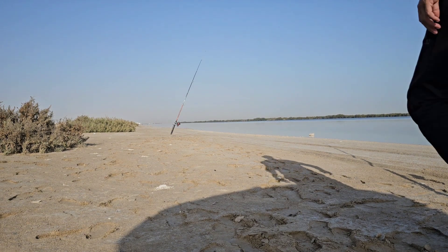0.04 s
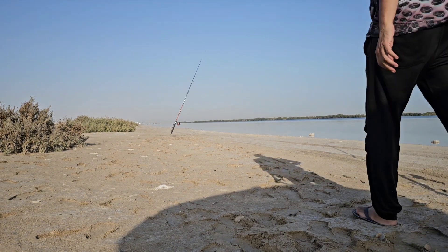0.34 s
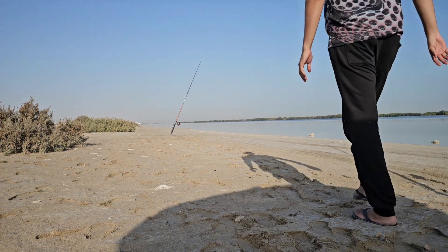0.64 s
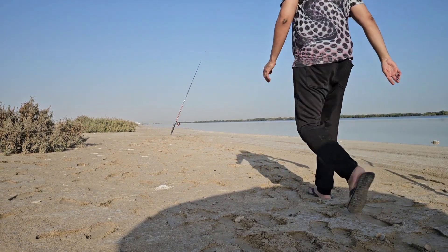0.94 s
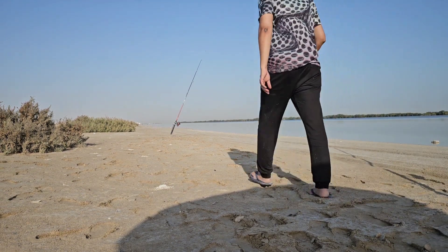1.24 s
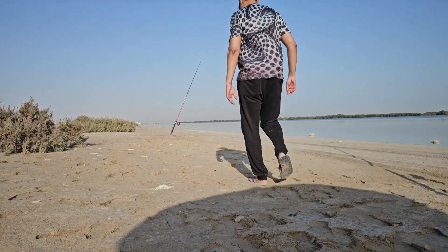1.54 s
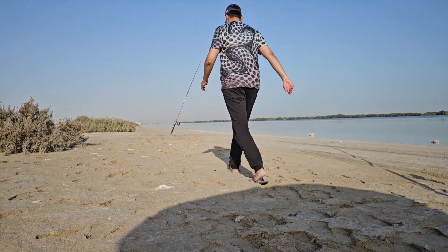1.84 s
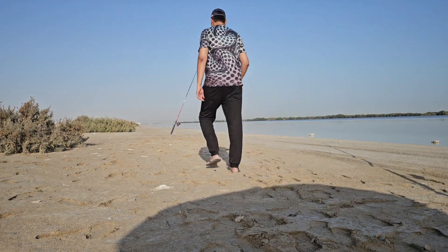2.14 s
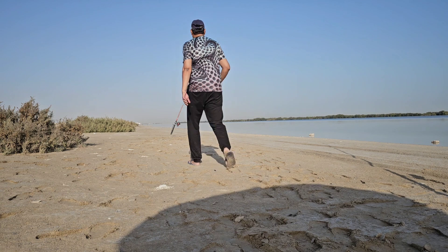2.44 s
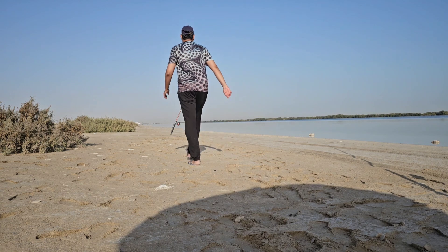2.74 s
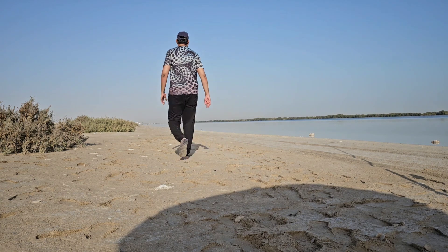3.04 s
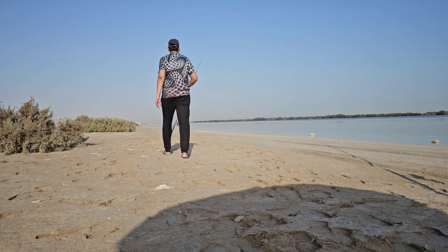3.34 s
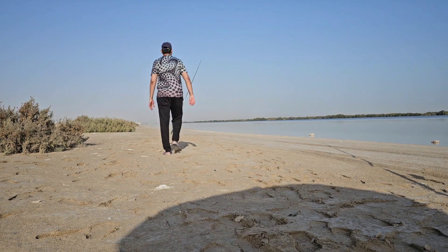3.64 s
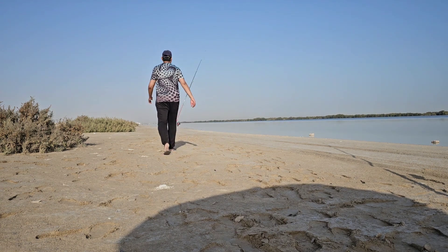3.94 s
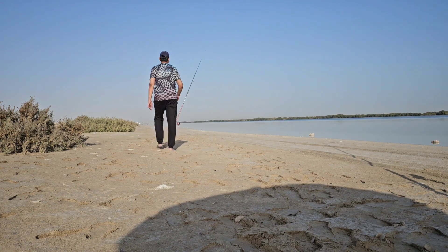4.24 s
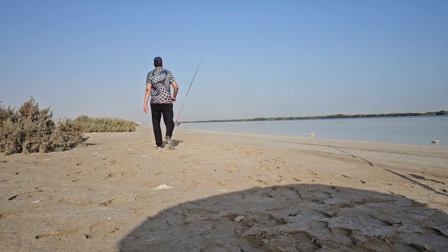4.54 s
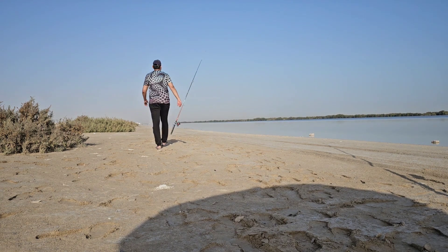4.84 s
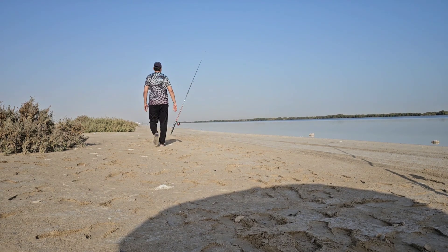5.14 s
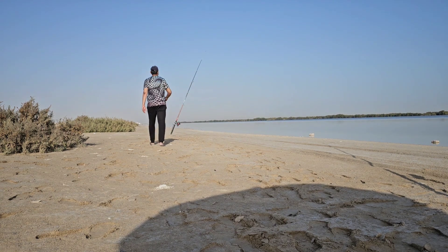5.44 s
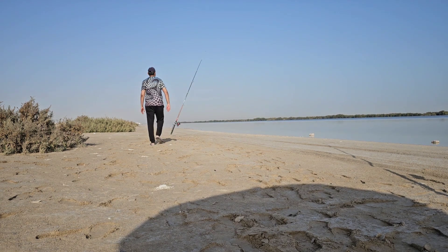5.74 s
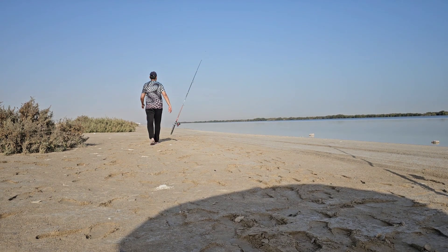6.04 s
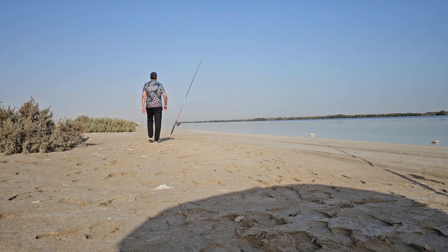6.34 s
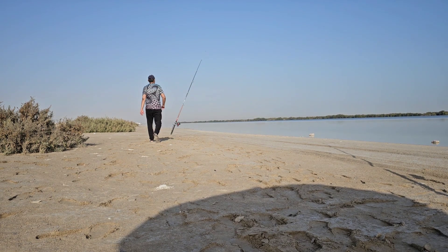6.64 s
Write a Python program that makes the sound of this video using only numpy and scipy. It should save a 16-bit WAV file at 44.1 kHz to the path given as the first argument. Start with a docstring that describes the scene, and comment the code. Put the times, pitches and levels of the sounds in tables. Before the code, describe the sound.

Flip-flops slap and crunch over dry crusted sand, fading as someone walks away, with steady wind rumbling on the microphone.

```python
"""Flip-flops on a sandy shore

Someone passes on the right of a stereo microphone and walks off, from under 2 m to about 8 m away. At each step
the heel lands, the sole grinds the dry crust, and the other sandal snaps up at its heel. Wind rumbles steadily
on the microphone, over a faint low hum and a thin far hiss."""
import sys
import numpy as np
from scipy import signal
from scipy.fft import rfft, irfft, next_fast_len
from scipy.io import wavfile
from scipy.ndimage import uniform_filter1d, map_coordinates

SR = 44100
rng = np.random.default_rng(int(sys.argv[2]) if len(sys.argv) > 2 else 0)


def unload_wav(signal):
    """Save mono or channel-first audio to the path in sys.argv[1] as 16-bit WAV at rate SR, clipped to [-1, 1]."""
    wavfile.write(
        sys.argv[1],
        SR,
        np.round(np.clip(np.atleast_2d(signal).T, -1, 1) * 32767).astype(np.int16),
    )


N = 298998
TIME = np.arange(N) / SR

# spectrum of the far hiss: freq_hz, level_db
FAR_SPECTRUM = [(300, 8.5), (700, 7.5), (1050, 2.5), (1450, -1.5), (2100, -5), (2700, -3.5), (4400, -2),
                (5400, -8.5), (6300, -7), (8000, -22), (11500, -14), (15500, -9.5)]
# narrow, faintly flickering bands that colour the background hiss: centre_hz, q, level_db
FAR_BANDS = [(1450, 6.3, -10.5), (2010, 8.4, -15), (3580, 16, -16), (4190, 18, -16.5), (4600, 8.6, -14)]
# tones of the low hum: pitch_hz, level_db
HUM_TONES = [(50, -48), (75.2, -51), (150.3, -59), (199.8, -64), (230.5, -69.5), (245, -66.5)]
# spectrum of wind on the microphone: freq_hz, level_db
WIND_SPECTRUM = [(10, -32.5), (17, -17.5), (27, -1.5), (45, 2), (72, 3), (100, -3.5), (130, -7), (175, -14),
                 (240, -17), (300, -26), (420, -36.5), (550, -41), (750, -64), (1400, -84)]
# strength of the wind: time_s, level_db
WIND_LEVEL = [(.03, -38), (.2, -36.5), (.245, -50), (.31, -39.5), (.6, -42), (.76, -38.5), (1.1, -39.5),
              (1.9, -41), (2.0, -40.5), (2.2, -40.5), (2.7, -39), (4.2, -41), (4.47, -40), (4.6, -38),
              (5.25, -41), (6.15, -39), (6.6, -40), (6.75, -40.5)]
# the walker's bearing at the microphone: time_s, left_lag_ms, treble_left_minus_right_db
BEARING = [(0.45, 0.27, -3.5), (1.0, 0.13, 2.5), (1.499, 0.084, 1), (1.997, -0.00084, 3),
           (3.001, -0.067, 3.5), (4.101, -0.087, 4), (6.701, -0.12, 4.5)]
# hard surfaces next to the microphone: delay_ms, gain
NEAR_ECHOES = [(2.4, 0.049), (4.7, 0.13), (7.3, 0.044)]
# peaks and dips of the microphone housing: centre_hz, q, gain_db
HOUSING = [(3540, 18, -4), (3600, 26, 2.5), (4300, 18, 1), (5170, 29, -1), (5370, 24, 1), (6250, 22, 1),
           (6880, 26, -3.5), (7250, 18, 2), (9200, 44, -1), (9200, 47, -0.5), (11370, 40, 3),
           (12200, 12, -1.5)]
# rubber creaking under the foot: peak_s, width_s, pitch_hz, level_db
CREAKS = [(1.118, 0.0097, 3600, -69.5), (1.254, 0.033, 1800, -84.5), (2.45, 0.006, 1250, -71),
          (2.956, .010, 1380, -71.5)]
# spectra of loose sand, crumbling crust and sand cracking on a sole: freq_hz, level_db
SAND_SPECTRUM = [(1500, -11.5), (3000, 2.5), (4500, 1.5), (6000, -1.5), (7800, -4.5), (9500, -7.5),
                 (11500, -3), (13000, -8), (15500, -3.5)]
CRUST_SPECTRUM = [(250, -16.5), (600, 9.5), (1300, 11), (2200, 10), (3300, 0), (5000, -14), (9000, -14)]
CRACK_SPECTRUM = [(500, -23.5), (1500, -15), (3000, -1), (4800, -1.5), (6300, -6), (7600, -8.5), (9000, -9),
                  (11000, -15), (15500, -21)]
# bits of crust breaking, and at 4.093 s sand flung off the sandal landing back, before distance loss: # peak_s,
# rise_s, fall_s, centre_hz, level_db
CRUST_SNAPS = [(.3105, .0004, 0.0018, 5500, -61), (.408, 0.0093, 0.0087, 2930, -47.5),
               (0.465, .004, 0.0036, 8040, -52), (.848, 0.0024, 0.0067, 7060, -60),
               (0.929, .0004, 0.0009, 7600, -37), (1.3323, 0.0005, 0.0014, 3220, -36.5),
               (1.433, 0.0037, 0.0051, 2800, -49), (1.476, 0.0033, 0.0035, 2700, -56),
               (1.771, 0.0011, 0.0018, 9500, -55), (1.782, .001, 0.0021, 9000, -52.5),
               (1.789, .001, 0.0025, 8000, -51), (2.354, .0004, 0.00083, 4600, -45),
               (4.093, 0.0054, 0.0064, 9000, -46.5)]
# the footfall ahead of each slap, before distance loss: heel_lead_s, heel_hz, heel_db, heel_fall_s,
# grind_lead_s, grind_hz, grind_db, grind_rise_s, crust_over_sand_db, toe_db
FOOTFALLS = [ (0.1653, 8000, -49, 0.02, 0.08, 8700, -42, 0.01, -7.5, -54.5),
             (0.155, 2400, -49.5, 0.011, 0.086, 8700, -42, 0.012, -10, -55),
             (0.1636, 4500, -45, 0.0098, 0.09, 9100, -50, 0.016, -6.5, -55),
             (0.187, 7000, -44, 0.014, 0.084, 10300, -36.5, 0.0071, -14.5, -51.5),
             (0.1785, 4800, -54, 0.028, 0.078, 7700, -42, 0.009, -10, -52.5),
             (0.171, 6100, -61.5, 0.015, .081, 13000, -37.5, 0.0073, -15.5, -48.5),
             (0.189, 5800, -48.5, 0.018, 0.079, 12000, -45.5, 0.012, -9, -51.5),
             (.219, 4000, -51, .041, 0.08, 8500, -47, 0.012, -13, -53),
             (.2, 5800, -69, .016, .081, 8600, -58, .012, -8, -53),
             (.2, 6100, -79, .018, 0.081, 7000, -43, .010, -15, -46.5),
             (.185, 7200, -61, 0.0173, .081, 8600, -66.5, .012, -8, -51.5),
             (0.21, 6100, -74, .022, 0.072, 8300, -40, 0.0045, -17, -46),
             (.198, 6100, -52, .010, .081, 8600, -65, .011, -14.5, -51)]
# sandal meeting heel, before distance loss: start_s, second_touch_ms, second_share, contact_ms, clap_q,
# pocket_hz, pocket_db, body_db, low_clap_hz, low_clap_db, high_clap_hz, high_clap_db,
# sole_hz, sole_db, sand_db
SLAPS = [(0.4882, 2.34, 0.26, 0.02, 3.4, 340, 12.5, -1, 1830, 6.5, 2560, 3.5, 7200, -0.5, -6.5),
         (1.014, 0.88, 0.55, 0.051, 7.2, 600, 9.5, -8, 1950, 11.5, 2620, 9, 4200, 15.5, -2),
         (1.5008, 1.71, 0.23, 0.064, 2.65, 300, 16, 0.5, 1460, 3.5, 2420, 3, 4600, 7, -5.5),
         (2.0104, 0.93, 0.32, 0.053, 4.3, 290, 10.5, -9, 1560, 4, 2570, 2.5, 6370, 3, -3),
         (2.5222, 0.67, 0.74, 0.055, 3.35, 330, 7.5, 11, 2300, 5.5, 3600, -3, 5250, 3, -6.5),
         (3.0383, 0.78, 0.17, 0.023, 2.8, 350, 3, -7, 1430, 0, 3720, -6.5, 5330, -10, -2),
         (3.56, 0.56, 0.2, 0.028, 6.3, 280, 8.5, -1.5, 1290, 1, 1850, -3.5, 5640, -8, -4.5),
         (4.0724, 1.524, 0.5, 0.14, 4.9, 340, 11, -4, 1060, 13, 1740, 16, 5810, 20, 0.5),
         (4.6033, 0.8, 0.21, 0.14, 5.5, 310, 12.5, 8.5, 1340, 2, 1950, 20, 3020, 18, -3.5),
         (5.1495, 0.67, 0.2, 0.13, 1.45, 320, 4, -2, 900, 1, 2000, 6, 5130, 22, -2.5),
         (5.6698, 0.69, 0.75, 0.14, 2.4, 470, -7.5, 7.5, 1320, 0, 3140, 12, 6900, 7.5, -3.5),
         (6.1925, 0.58, 0.3, 0.025, 1.6, 420, 5, -12.5, 940, -3, 1740, -4.5, 3600, -6, 2.5),
         (6.721, 1.3, 0.35, 0.13, 4.2, 490, 3.5, -12, 1040, 5.5, 1900, 6, 4690, 5, 1.5)]


def undb(db):
    """Decibels to gain."""
    return 10 ** (np.asarray(db) / 20)


def unit(x):
    """Scale to rms 1."""
    return x / np.sqrt(np.mean(x ** 2))


def unit_energy(x):
    """Scale each row to energy 1."""
    return x / np.linalg.norm(x, axis=1, keepdims=True)


def butter(order, hz, kind):
    """Sections of a low-pass or high-pass filter."""
    return signal.butter(order, hz, kind, fs=SR, output="sos")


def colour(x, spectrum):
    """Minimum-phase filter through (freq_hz, level_db) points."""
    hz, db = np.transpose(spectrum)
    size = next_fast_len(x.shape[-1] + 4096, True)
    freqs = np.maximum(np.fft.rfftfreq(size, 1 / SR), 1)
    gain = undb(np.interp(np.log(freqs), np.log(hz), db))
    cepstrum = irfft(np.log(gain), size)
    cepstrum[1:size // 2] *= 2
    cepstrum[size // 2 + 1:] = 0
    return irfft(rfft(x, size) * np.exp(rfft(cepstrum)), size)[..., :x.shape[-1]]


def ring(x, hz, q):
    """A damped resonance, gain 1 at its centre, which is capped at SR / 4."""
    return signal.lfilter(*signal.iirpeak(min(hz, SR / 4), q, SR), x)


def wander(per_s):
    """Smooth random drift with a spread near 1."""
    return map_coordinates(rng.standard_normal(1024), [TIME * per_s], order=3, mode="wrap")


def grains(per_s, spread_db):
    """Tiny clicks at random times and of random size."""
    size = undb(spread_db * np.minimum(rng.exponential(size=N), 5))
    return unit((rng.random(N) < per_s / SR) * size * rng.standard_normal(N))


def stereo(mid, side, split_hz):
    """A left and right pair, alike in the bass and drifting apart above split_hz."""
    apart = signal.sosfilt(butter(2, split_hz, "high"), side)
    return np.array([mid + apart, mid - apart])


def far_shore(base_db=-81.5, early_db=4.0):
    """Hiss all around, a little louder at first; the stronger bands shimmer."""
    hiss = unit(colour(rng.standard_normal((2, N)), FAR_SPECTRUM))
    for hz, q, db in FAR_BANDS:
        shimmer_db = 2.2 * wander(16)
        hiss += unit(ring(rng.standard_normal((2, N)), hz, q)) * undb(db + shimmer_db)
    swell_db = 0.6 * wander(2.0)
    return hiss * undb(base_db + swell_db + early_db * np.exp(-TIME / 0.8))


def low_hum():
    """Faint low tones, each wavering in level and pitch."""
    hum = np.zeros(N)
    for hz, db in HUM_TONES:
        amplitude = np.sqrt(2) * undb(db + 2 * wander(1.8))
        pitch_hz = hz + 0.39 * wander(2.972)
        hum += amplitude * np.sin(2 * np.pi * np.cumsum(pitch_hz) / SR)
    return hum


def wind_and_hum(gust_db=0.97, side_db=-14, lean_left_db=1.25):
    """Wind rumbles on the microphone in mild gusts over the hum, nearly alike in both channels."""
    mid, side = (unit(colour(rng.standard_normal(N), WIND_SPECTRUM)) for _ in range(2))
    mid /= np.sqrt(uniform_filter1d(mid ** 2, SR // 4))  # leaves slow swells to the gusts
    gusts = undb(np.interp(TIME, *np.transpose(WIND_LEVEL)) + gust_db * wander(7))
    sign = np.array([[1], [-1]])
    rumble = gusts * (mid + undb(side_db) * sign * side)
    return (rumble + low_hum()) * undb(sign * lean_left_db / 2)


def near_echoes(x, above_hz=1500):
    """Small surfaces next to the microphone reflect the treble and ripple its colour."""
    treble = signal.sosfilt(butter(1, above_hz, "high"), x)
    return x + sum(gain * np.pad(treble, ((0, 0), (int(ms * SR / 1000), 0)))[:, :N]
                   for ms, gain in NEAR_ECHOES)


def ground_scatter(x, ground_t60_s=0.068, bush_t60_s=0.36, bush_db=-12, dull_hz=6000):
    """Rough ground throws back a short gritty tail, bushes a longer faint one."""
    t = TIME[:SR // 2]
    patches = rng.standard_normal((2, len(t))) * (rng.random((2, len(t))) < 2500 / SR)
    ground = patches * 1000 ** (-t / ground_t60_s) * (1 - np.exp(-t / 0.0044))
    bushes = rng.standard_normal((2, len(t))) * 1000 ** (-t / bush_t60_s) * (1 - np.exp(-t / 0.018))
    tail = unit_energy(ground) + undb(bush_db) * unit_energy(bushes)
    tail = signal.sosfilt(butter(1, dull_hz, "low"), tail)
    share = undb(np.linspace(-29, -8, N))  # grows as the walker moves off
    return signal.fftconvolve((x * share)[None], tail, axes=1)[:, :N]


def distance_m(s, start_m=1.61, pace_m_per_s=0.97):
    """From the microphone to the walker, who leaves at a steady pace."""
    return start_m + pace_m_per_s * s


def sand_gain(s, ground_db_per_m=2):
    """Sand noise spreads with distance and is soaked up by the ground."""
    return undb(-ground_db_per_m * distance_m(s)) / distance_m(s)


def place_walker(pair, shade_hz=1500):
    """The walker's bearing delays one channel against the other and tips the treble to one side."""
    s, lag_ms, pan_db = np.transpose(BEARING)
    lag = np.interp(TIME, s, lag_ms) * SR / 1000
    pan = np.interp(TIME, s, pan_db)
    heard = np.array([map_coordinates(x, [np.arange(N) - side * lag / 2], order=3)
                      for x, side in zip(pair, (1, -1))])
    treble = signal.sosfiltfilt(butter(1, shade_hz, "high"), heard)
    return heard + treble * (undb(np.array([pan, -pan]) / 2) - 1)


def rubber_creaks(q=5):
    """Rubber sticks and slips on the foot, ringing one rough resonance for a moment."""
    slips = grains(per_s=700, spread_db=1.5)
    out = np.zeros(N)
    for peak_s, width_s, hz, db in CREAKS:
        swell = np.exp(-.5 * ((TIME - peak_s) / width_s) ** 2)
        out += undb(db) * swell * unit(ring(ring(slips, hz, q), hz, q))
    return out


def sand_scuffs(slip_db=1.7):
    """Weight comes on and off the sole: loose grains hiss and the crust crumbles in small slips."""
    loose = stereo(grains(per_s=5000, spread_db=0.5), grains(per_s=11000, spread_db=0), split_hz=6000)
    sand = colour(loose, SAND_SPECTRUM)
    crust = unit(colour(grains(per_s=4900, spread_db=-2.2), CRUST_SPECTRUM))

    def rub(peak_s, rise_s, fall_s, hz, db, crunch, q=1.0):
        """One swell of grainy hiss with a share of crunching crust."""
        near = abs(TIME - peak_s) < 8 * max(rise_s, fall_s)
        t = TIME[near] - peak_s
        load = np.exp(-.5 * abs(t / np.where(t < 0, rise_s, fall_s)) ** 1.18)
        hiss = unit(ring(sand[:, near], hz, q))
        sound = np.zeros((2, N))
        sound[:, near] = undb(db) * load * (hiss + crunch * crust[near])
        return sound

    out = np.zeros((2, N))
    for (slap_s, *_), footfall in zip(SLAPS, FOOTFALLS):
        (heel_lead_s, heel_hz, heel_db, heel_fall_s,
         grind_lead_s, grind_hz, grind_db, grind_s, crust_db, toe_db) = footfall
        # trouser legs brush in mid-stride, the heel lands, the sole grinds, the rear toe sprays sand
        out += rub(slap_s - 0.35, rise_s=0.16, fall_s=0.16, hz=8440, db=-73, crunch=0)
        out += rub(slap_s - heel_lead_s, 0.005, heel_fall_s, heel_hz, heel_db, undb(crust_db + 3))
        out += rub(slap_s - grind_lead_s, grind_s, 0.7 * grind_s, grind_hz, grind_db, undb(crust_db))
        out += rub(slap_s - 0.0052, rise_s=0.015, fall_s=0.017, hz=6900, db=toe_db, crunch=undb(1))
    for snap in CRUST_SNAPS:
        out += rub(*snap, crunch=0.064, q=1.6)
    return out * sand_gain(TIME) * undb(slip_db * wander(240))


def sandal_slaps(pocket_q=2.09, body_hz=566, body_q=4, sole_q=6.0, grit_s=0.0032, rattle=0.2):
    """The sole claps the heel in two quick, hollow touches; trapped air pops and sand on it cracks."""
    out = np.zeros((2, N + SR))
    t = TIME[:2048]
    tick = 0.26 * (np.arange(len(t)) == 2)
    for (start_s, second_ms, second_share, contact_ms, clap_q, pocket_hz, pocket_db, body_db,
         low_hz, low_db, high_hz, high_db, sole_hz, sole_db, sand_db) in SLAPS:
        ages = (np.maximum(t * 1000 - ms, 0) / contact_ms for ms in (0, second_ms))
        first, second = (age * np.exp(-age) for age in ages)
        push = (first + second_share * second) / first.sum()
        grit_mid, grit_side, rim = unit_energy(rng.standard_normal((3, len(t))) * np.exp(-t / grit_s))
        # the rim of the sole follows in many small contacts
        blow = push + rattle * np.convolve(push, rim)[:len(t)]
        # the soft sole bends, spreading the blow in time without changing its colour
        blow -= 2 * ring(blow, hz=3600, q=2.2)
        modes = [(pocket_hz, pocket_q, pocket_db), (body_hz, body_q, body_db),
                 (low_hz, clap_q, low_db), (high_hz, clap_q, high_db), (sole_hz, sole_q, sole_db)]
        pop = sum(undb(db) * ring(blow, hz, q) for hz, q, db in modes)
        grit = stereo(grit_mid, 1.68 * grit_side, split_hz=9000)
        crack = undb(sand_db) * colour(grit + tick, CRACK_SPECTRUM)
        start = int(start_s * SR)
        out[:, start:start + len(t)] += pop / distance_m(start_s) + crack * sand_gain(start_s)
    return out[:, :N]


def scene(slap_scatter_db=1.5):
    """At the microphone: the walker, the ground's short answer, the far shore and the wind."""
    slaps = sandal_slaps()
    underfoot = sand_scuffs() + rubber_creaks()
    scattered = ground_scatter((undb(slap_scatter_db) * slaps + underfoot).mean(axis=0))
    walker = place_walker(slaps + underfoot)
    return near_echoes(walker + scattered + far_shore()) + wind_and_hum()


def record(dry, top_hz=15550):
    """The microphone housing ripples the treble and the recorder cuts the top."""
    for hz, q, db in HOUSING:
        dry = dry + (undb(db) - 1) * ring(dry, hz, q)
    return signal.sosfilt(signal.ellip(10, .1, 80, top_hz, fs=SR, output="sos"), dry)


dry = scene()
out = record(dry)
unload_wav(out)
```